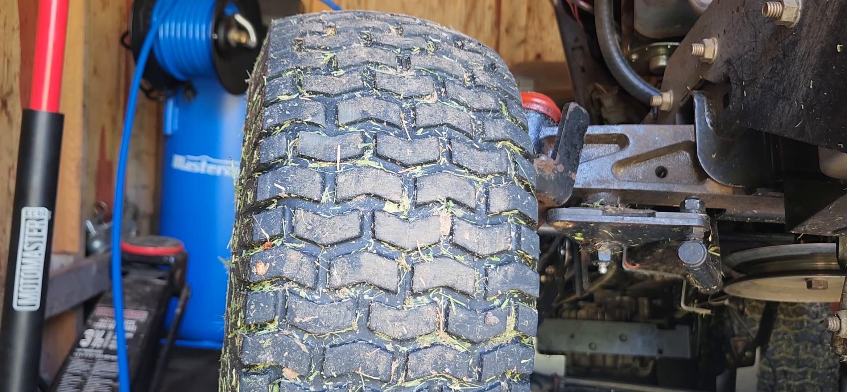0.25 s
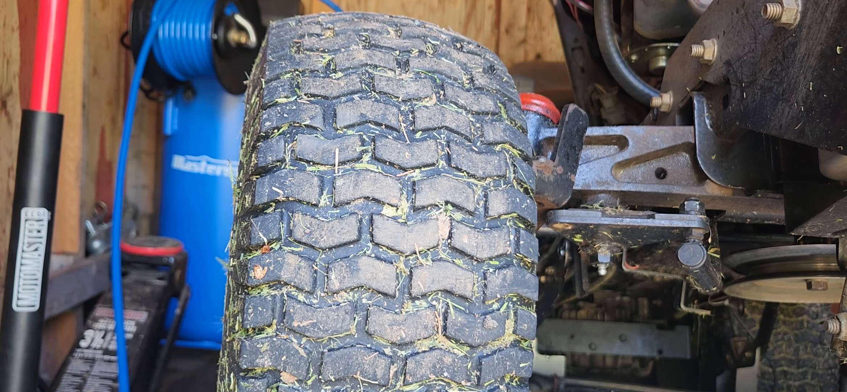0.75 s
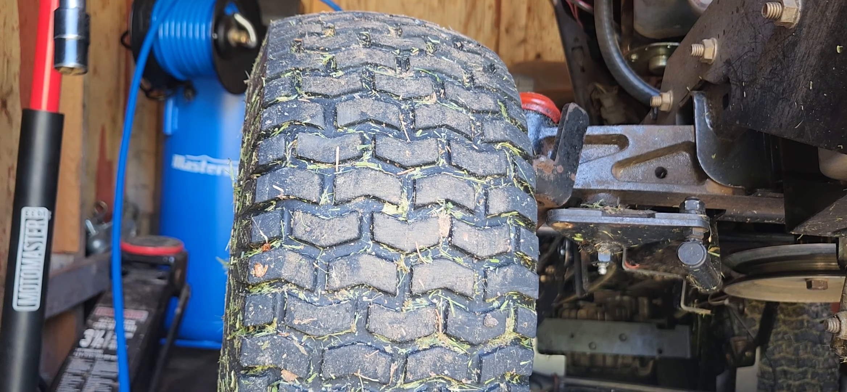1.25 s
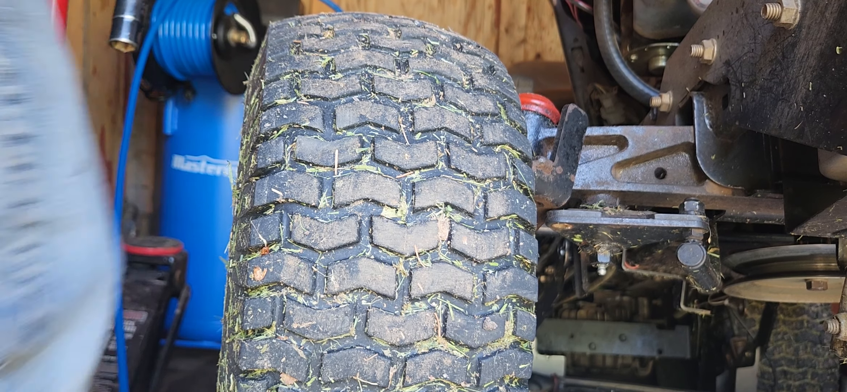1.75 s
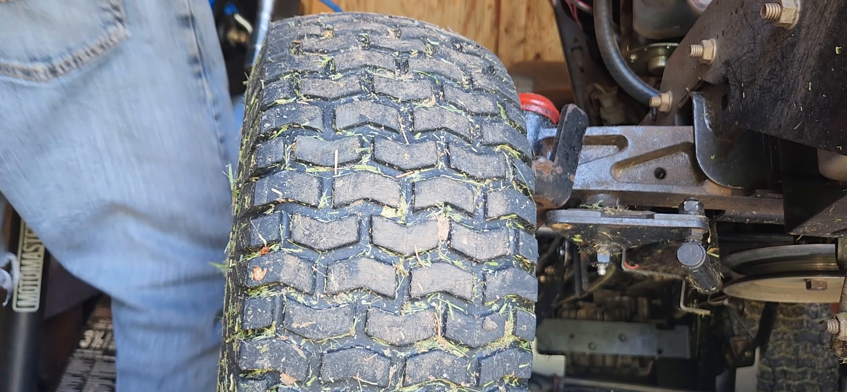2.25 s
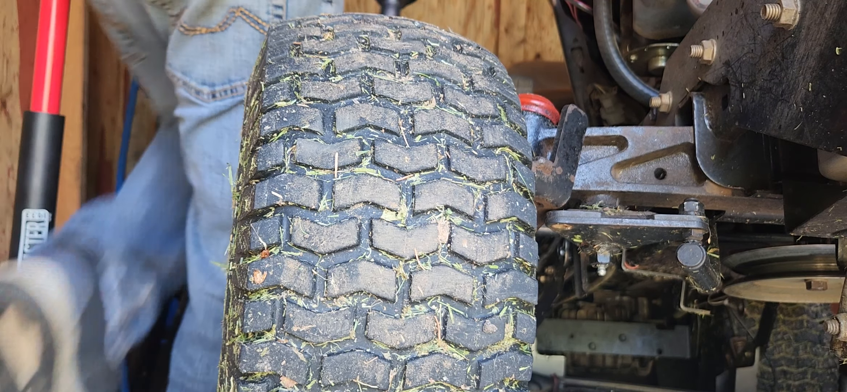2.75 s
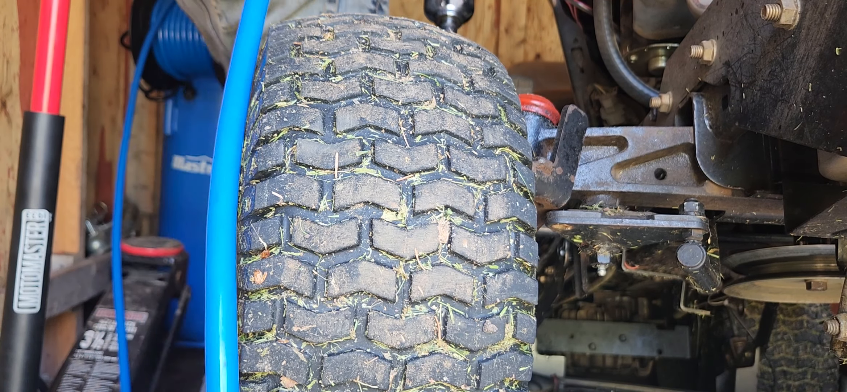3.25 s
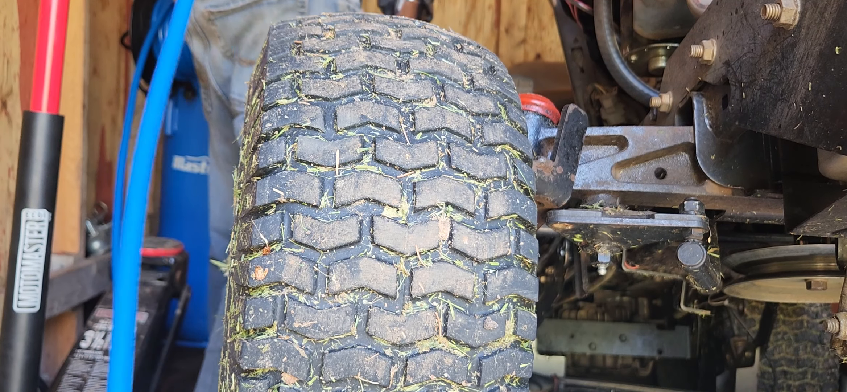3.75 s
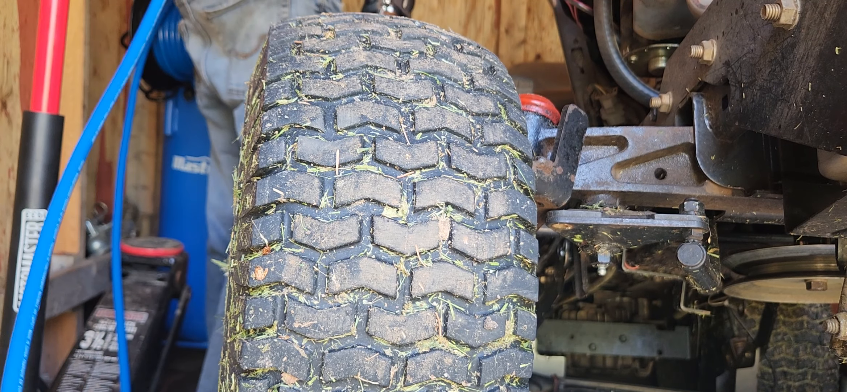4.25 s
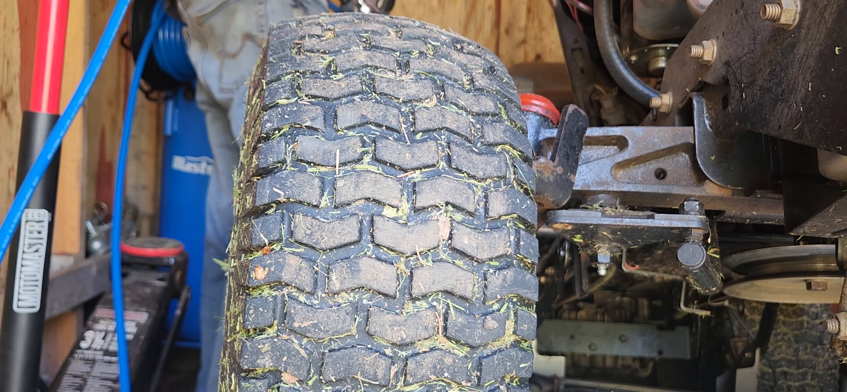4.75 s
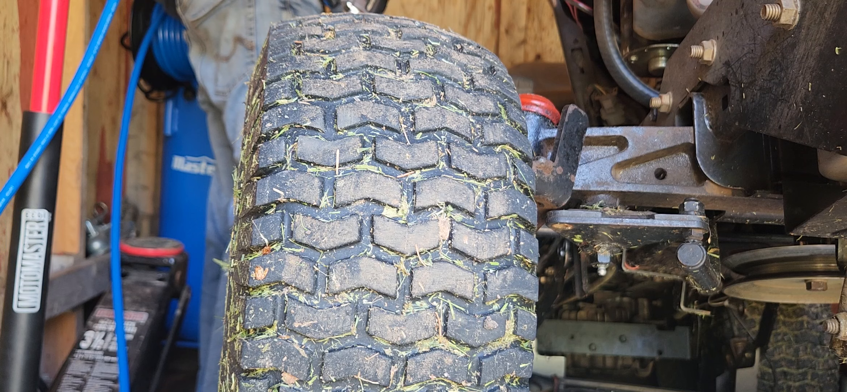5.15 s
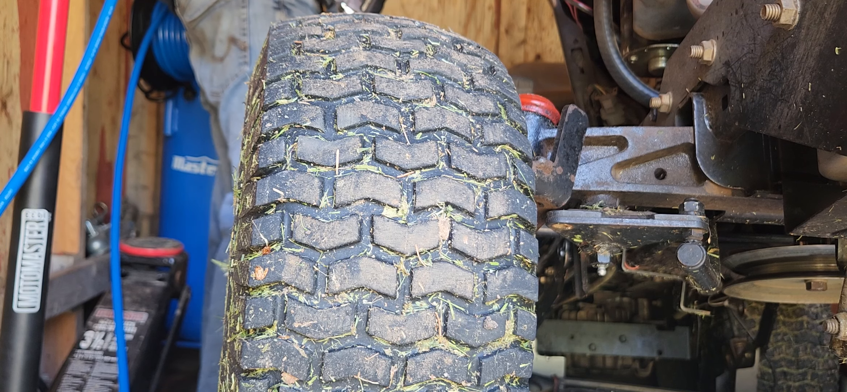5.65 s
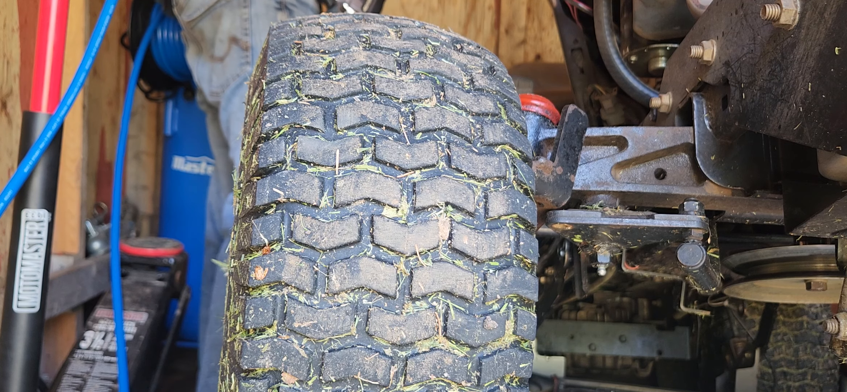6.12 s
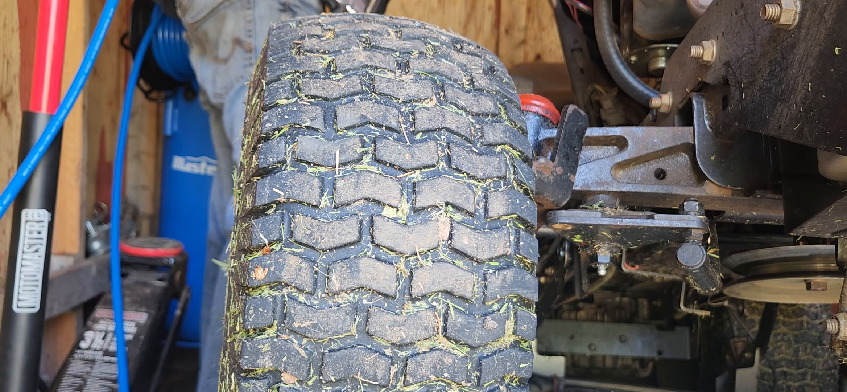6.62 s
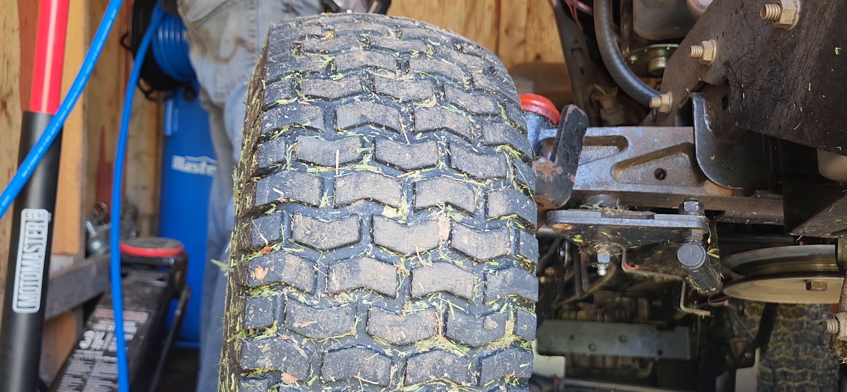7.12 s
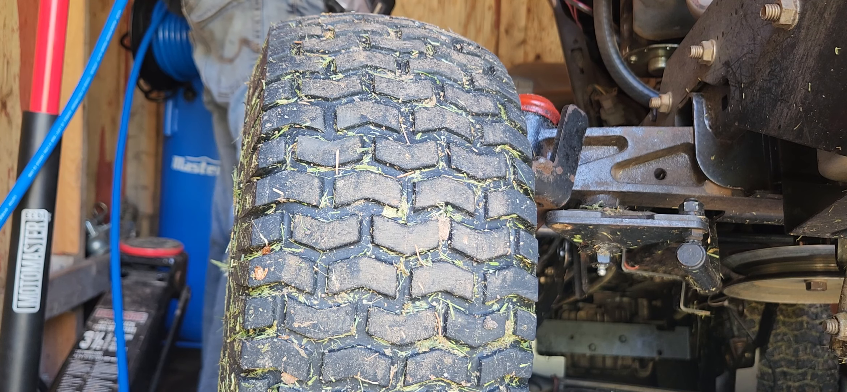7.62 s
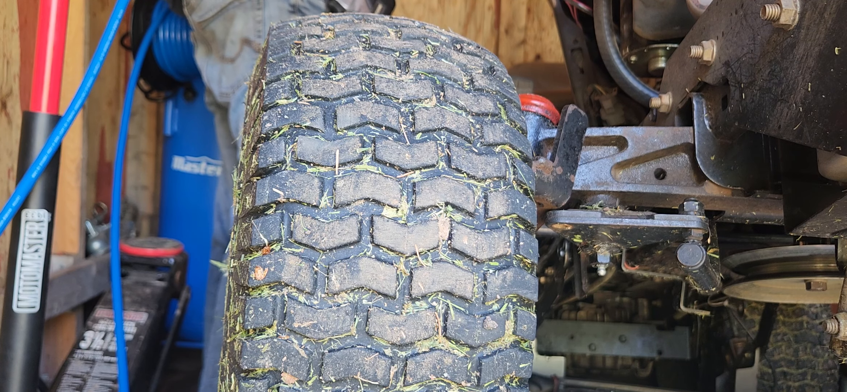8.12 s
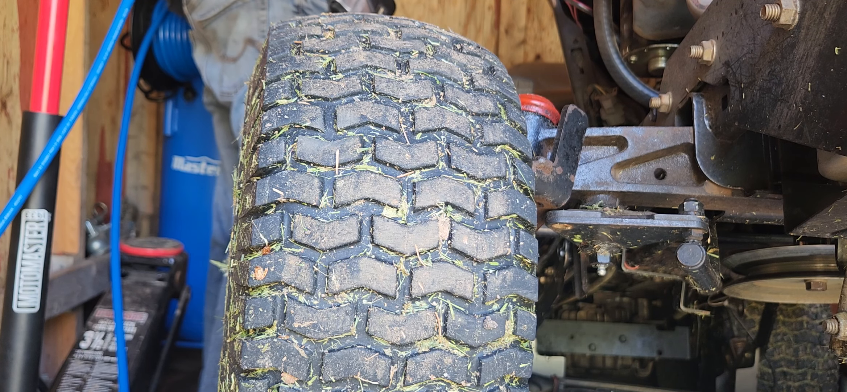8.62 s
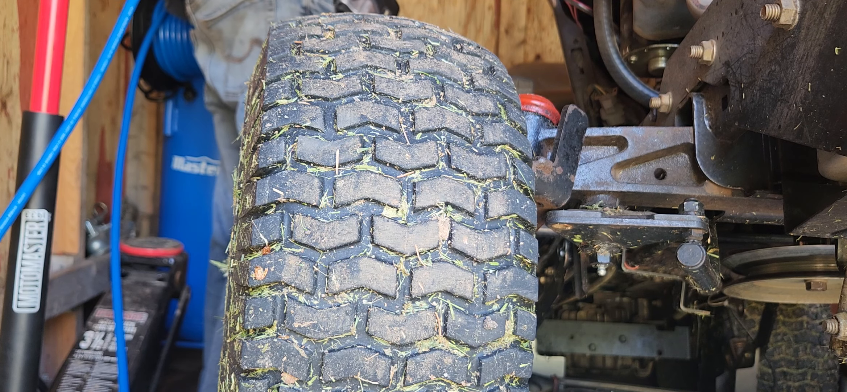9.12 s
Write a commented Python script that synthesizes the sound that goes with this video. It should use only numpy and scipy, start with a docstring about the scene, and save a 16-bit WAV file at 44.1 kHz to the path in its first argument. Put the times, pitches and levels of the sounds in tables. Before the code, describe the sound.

A shrill, steady compressed-air leak whistles and hisses while boots thud on planks and metal clicks, then it shuts off, leaving a faint seep.

```python
"""Air leak in a wooden shed

Compressed air jets from a leaking fitting and whistles in its cavities until it is shut off: noise shaped by
resonances. A faint seep then swells and fades over a constant faint room hiss, both filtered noise. Boots thud and
scuff on the plank floor and metal parts click: sums of decaying modes with short noise bursts. A vehicle nears on
the road outside: banded noise that swells. A thin hum, one wavering sine, comes and goes."""
import sys
import numpy as np
from scipy import signal
from scipy.fft import rfft, irfft, next_fast_len
from scipy.io import wavfile
from scipy.ndimage import uniform_filter1d

SR = 44100
rng = np.random.default_rng(int(sys.argv[2]) if len(sys.argv) > 2 else 0)


def int16_out(signal):
    """Quantize to a 16-bit WAV file."""
    q = np.round(np.clip(np.atleast_2d(signal).T, -1, 1) * 32767)
    wavfile.write(sys.argv[1], SR, q.astype(np.int16))


def undo_db(level):
    """Turn decibels back into plain size, where 20 dB means ten times bigger."""
    steps = np.asarray(level, float) / 20
    return 10 ** steps


N = 413738
TIME = np.arange(N) / SR
BLOW_TIME = np.arange(int(0.4 * SR)) / SR


def curve(table):
    """Each value column of a (s, value, ..) table, interpolated at every sample."""
    s, *columns = np.transpose(table)
    return [np.interp(TIME, s, column) for column in columns]


def along(table, hz):
    """A (Hz, value) table read on a log axis."""
    table_hz, value = np.transpose(table)
    return np.interp(np.log(hz + 1), np.log(table_hz + 1), value)


def colour(x, table, peaks=()):
    """Shapes x by a spectrum and by resonances (Hz, width Hz, dB) that stand above it."""
    size = next_fast_len(x.shape[-1])
    hz = np.arange(size // 2 + 1) * SR / size
    power = 1 + sum(undo_db(2 * db) / (1 + (2 * (hz - f) / width) ** 2) for f, width, db in peaks)
    gain = undo_db(along(table, hz)) * np.sqrt(power)
    return irfft(rfft(x, size) * gain, size)[..., :x.shape[-1]]


def band(x, lo_hz, hi_hz):
    """Steep band-pass, scaled to rms 1."""
    sos = signal.butter(3, [lo_hz, hi_hz], "bandpass", fs=SR, output="sos")
    y = signal.sosfiltfilt(sos, x)
    return y / np.sqrt(np.mean(y ** 2))


def walk(rate_hz):
    """Random levels held 1 / rate_hz s and slewed twice; spread near 1."""
    hold = int(SR / rate_hz)
    held = np.repeat(rng.standard_normal(N // hold + 1), hold)
    return 1.3 * uniform_filter1d(uniform_filter1d(held, hold), hold)[:N]


def shed(x, wet_db, like_hz, t60_s, lag_samples):
    """Direct sound, later on the right, plus decaying echoes shared by both ears below like_hz."""
    t = np.arange(int(0.4 * SR)) / SR
    common, *own = rng.standard_normal((3, len(t)))
    own = np.array(own)
    low = signal.butter(2, like_hz, fs=SR, output="sos")
    cloud = own + signal.sosfiltfilt(low, common - own)
    cloud = cloud * undo_db(-60 * t / t60_s) * np.minimum(t / 0.004, 1)
    cloud = cloud * undo_db(wet_db) / np.sqrt(np.mean(np.sum(cloud ** 2, axis=1)))
    direct = np.array([x, np.roll(x, lag_samples)])
    echoes = signal.fftconvolve(x[None], cloud, axes=1)[:, :N]
    return (direct + echoes) / np.sqrt(1 + undo_db(2 * wet_db))


def ring(modes, struck_hz, focus_db_per_octave, detune):
    """One blow, peak 1: modes lose level with their distance from the struck spot's pitch."""
    f, db, t60_s = np.transpose(modes)[:, :, None]
    away_db = focus_db_per_octave * np.abs(np.log2(f / struck_hz))
    size = undo_db(db - away_db - 60 * BLOW_TIME / t60_s)
    tone = np.sin(2 * np.pi * f * (1 + 0.02 * detune[:, None]) * BLOW_TIME)
    y = np.sum(size * tone, axis=0)
    return y / np.max(np.abs(y))


def add(track, s, sound):
    """Adds a sound at time s."""
    i = int(s * SR)
    track[i:i + len(sound)] += sound[:N - i]


# Road bands. Each row: low edge in Hz, high edge in Hz, steady level in dB, vehicle level at its nearest in dB,
# vehicle rise in dB per s.
ROAD = [(20.1, 95, -55.5, -41, 1.55), (95.6, 478, -59, -43.5, 6.5), (466, 1910, -56, -40, 8),
        (1875, 3700, -59.5, -49, 12.5), (3620, 6000, -63.5, -61, 4.5)]
# Spectrum of both road layers. Each row: frequency in Hz, relative density in dB per Hz.
ROAD_COLOUR = [(15, -34), (25, -14), (44, -6.5), (69, -3.5), (259, -18), (374, -20), (471, -23),
               (664, -20.5), (728, -20), (980, -21.5), (1260, -23), (1480, -25.5), (3620, -35),
               (5350, -32.5), (6000, -43), (7800, -53), (13200, -120)]
# Resonances of far traffic, then of the vehicle. Each row: frequency in Hz, width in Hz, height in dB.
ROAD_PEAKS = [(62.3, 3.4, 8), (112, 11, 2.5)]
VEHICLE_PEAKS = [(65.2, 9, 13.5), (112, 8.9, 6), (369, 15, 7), (668, 23, 9), (977, 73, 10), (1057, 46, 3.5),
                 (1500, 93, 10), (1690, 70, 10)]
# Likeness of the ears. Each row: frequency in Hz, left-right correlation (-1 to 1).
ROAD_LIKENESS = [(60, 0.99), (130, 0.95), (290, 0.85), (640, 0.42), (1410, -0.27), (3100, -0.038),
                 (6820, 0.093), (15000, 0.03)]
NEAREST_S = 9.4


def road():
    """Far traffic and a nearing vehicle through the walls: ears alike in the bass, nearly unrelated at the top."""
    likeness = np.clip(ROAD_LIKENESS, -0.5, [SR, 0.995])
    side_over_mid = [(f, 10 * np.log10((1 - c) / (1 + c))) for f, c in likeness]
    layers = []
    for peaks in (ROAD_PEAKS, VEHICLE_PEAKS):
        mid, side = colour(rng.standard_normal((2, N)), ROAD_COLOUR, peaks)
        layers.append(mid + colour(side, side_over_mid) * np.array([[1], [-1]]))
    out = 0
    for lo_hz, hi_hz, steady_db, near_db, rise_db_per_s in ROAD:
        far, near = (band(x, lo_hz, hi_hz) for x in layers)
        vehicle_db = near_db - rise_db_per_s * (NEAREST_S - TIME)
        out = out + (far * undo_db(steady_db) + near * undo_db(vehicle_db)) * undo_db(1.0 * walk(3.19))
    return out


# Spells of hum. Each row: start in seconds, length in seconds, level in dB.
HUM = [(4.126, .75, -62), (5.103, 1.14, -64), (6.3, 0.43, -63.5), (6.85, 0.29, -62.5)]
HUM_HZ, HUM_DRIFT_HZ, HUM_FADE_S = 235.6, 3.17, 0.051


def hum():
    """A thin tone that wavers a little in pitch and level, and comes and goes."""
    hz = HUM_HZ + HUM_DRIFT_HZ * walk(5.5)
    tone = np.sqrt(2) * np.sin(2 * np.pi * np.cumsum(hz) / SR)
    spells = 0
    for s, length_s, db in HUM:
        to_edge_s = np.minimum(TIME - s, s + length_s - TIME)
        spells = spells + undo_db(db) * np.clip(to_edge_s / HUM_FADE_S, 0, 1)
    return tone * spells * undo_db(1.0 * walk(7))


# Spectra of the room hiss and of the swelling seep. Each row: frequency in Hz, relative density in dB per Hz.
HISS_COLOUR = [(5000, -4), (8000, -2), (12000, -4.5), (16000, -4)]
SEEP_COLOUR = [(3000, -20), (4000, 0), (5500, -6), (6200, -14.5), (7000, -13), (8200, -8), (9000, 0.5),
               (9700, -2.5), (10300, -14), (12300, -7.5), (13500, -6), (16000, -3.5)]
# Their resonances. Each row: frequency in Hz, width in Hz, height in dB.
HISS_PEAKS = [(10700, 130, 5.5), (14250, 250, 8)]
SEEP_PEAKS = [(5100, 89, 11.5), (7500, 180, 8.5), (8800, 100, 4), (9900, 72, 4), (11700, 240, 8),
              (12850, 90, 9), (14300, 150, 5), (15400, 90, -7)]
# Swells of the seep. Each row: start in seconds, level in dB, fade in dB per s.
PUFFS = [(7.53, -55.5, 9), (7.94, -55, 9), (8.48, -55, 24)]
HISS_DB, PUFF_ATTACK_S = -65, 0.09


def room_hiss_and_seep():
    """A constant faint room hiss, and a thin stream of air that swells quickly and fades slowly."""
    hiss = colour(rng.standard_normal((2, N)), HISS_COLOUR, HISS_PEAKS)
    hiss = band(hiss, 5200, 17600) * undo_db(HISS_DB)
    seep = band(colour(rng.standard_normal((2, N)), SEEP_COLOUR, SEEP_PEAKS), 4600, 21800)
    flow = 0
    for s, db, fade_db_per_s in PUFFS:
        attack = np.clip((TIME - s) / PUFF_ATTACK_S, 0, 1)
        flow = flow + attack * undo_db(db - fade_db_per_s * np.maximum(TIME - s, 0))
    both = hiss + seep * flow * undo_db(1.0 * walk(9))
    return sum(shed(x, wet_db=9, like_hz=300, t60_s=0.24, lag_samples=13) for x in both)


# Footfalls, levels before echoes. Each row: start in seconds, thud peak in dB, struck pitch in Hz,
# scuff level in dB, added damping t60 in ms.
STEPS = [(.0, -56, 300, -39.5, 740), (.300, -20, 102.7, -38, 720), (0.366, -22, 90, -56, 320),
         (0.411, -21.5, 108, -52, 440), (0.574, -34, 86, -41, 320), (0.677, -37.5, 80, -59, 500),
         (.929, -48, 225, -36, 290), (0.966, -23.5, 112, -50, 180), (1.127, -24, 112, -34, 270),
         (1.152, -22, 124, -41.5, 160), (1.424, -21, 108, -39, 180), (1.489, -32, 109, -53, 1600),
         (1.616, -33, 105, -49, 920), (1.673, -30, 111, -33.5, 620), (1.96, -53, 60, -46.5, 450),
         (2.324, -25.5, 196, -35, 210), (2.344, -20.5, 108, -55, 170), (2.589, -41, 130, -52, 440),
         (3.175, -49, 250, -42.5, 350), (3.21, -47, 312, -48, 300), (3.511, -19.5, 177, -29.5, 260),
         (3.53, -18, 86, -38.5, 400), (3.569, -30, 45.6, -58, 280), (3.649, -34, 43, -54, 380),
         (3.699, -43, 63, -50, 300), (3.864, -50, 312, -46, 350), (3.913, -33, 160, -47, 300),
         (3.938, -43, 225, -38.5, 300), (3.963, -27.5, 162, -41.5, 300), (4.042, -31, 62, -50, 400),
         (4.966, -53, 225, -55, 240), (6.151, -35.5, 167, -44.5, 230)]
# Plank modes. Each row: frequency in Hz, relative level in dB, undamped t60 in seconds.
PLANKS = [(43, -5, 0.82), (63, -7, 0.2), (86, 7.5, 0.21), (108, 5.5, 0.42), (120.5, 5, 0.15),
          (167, 0.5, 0.24), (225, 4, 0.3), (312, 3, .2), (375, 9, 0.17), (517, -12, .2), (668, -14, .15)]
# Scuff spectrum. Each row: frequency in Hz, relative density in dB per Hz.
SCUFF_COLOUR = [(150, 0.5), (300, 5), (600, -3), (1200, -19), (2500, -20), (5000, -48)]
LOAD_S, SCUFF_ATTACK_S, SCUFF_DECAY_S = 0.009, 0.0019, 0.04


def steps():
    """A soft heel loads the planks over a few milliseconds; the sole scrapes for a moment."""
    thuds, scrape = np.zeros(N), np.zeros(N)
    chance = rng.standard_normal((len(STEPS), len(PLANKS)))
    t = BLOW_TIME
    load = 1 - np.exp(-t / LOAD_S)
    scuff = np.minimum(t / SCUFF_ATTACK_S, 1) * np.exp(-t / SCUFF_DECAY_S)
    for (s, db, hz, scuff_db, t60_ms), detune in zip(STEPS, chance):
        # the weight that stays on the plank damps its ring
        damping = undo_db(-60 * t / (t60_ms / 1000))
        blow = ring(PLANKS, hz, 32, detune) * load * damping
        add(thuds, s, undo_db(db) * blow / np.max(np.abs(blow)))
        add(scrape, s, undo_db(scuff_db) * scuff)
    grit = band(colour(rng.standard_normal(N), SCUFF_COLOUR), 114, 4600) * undo_db(2.0 * walk(90))
    thuds = shed(thuds, wet_db=-4, like_hz=325, t60_s=0.33, lag_samples=15)
    return thuds + shed(scrape * grit, wet_db=2.0, like_hz=334, t60_s=0.12, lag_samples=3)


# Clicks, levels before filter and echoes. Each row: start in seconds, peak in dB, struck pitch in Hz,
# rattle over the click peak in dB.
CLICKS = [(0.7127, -11.5, 4100, -23.5), (.7214, -32, 3500, -21), (1.1433, -25, 2300, -19),
          (1.60, -33.5, 2300, -17), (1.69, -46, 1500, -8), (1.97, -40, 1500, -9), (3.1878, -38, 1140, -16),
          (3.515, -43, 2300, -5), (3.92, -44, 2300, -3), (6.146, -34, 784, -8), (6.162, -35, 780, -11),
          (6.17, -43, 2300, -4), (6.195, -40, 1282, -8), (7.42, -55, 2300, 1), (7.892, -49, 1050, -6)]
# Modes of the metal coupling. Each row: frequency in Hz, relative level in dB, t60 in seconds.
METAL = [(596, -2, 0.18), (756, 19, 0.12), (1050, 1, 0.033), (1282, 2, 0.14), (2300, 2, .06),
         (2600, -23, .08), (3140, 9.5, 0.027), (3500, 14, 0.023), (3780, 19, 0.015), (4550, 11, 0.016),
         (5350, 9, 0.021)]
# Rattle spectrum. Each row: frequency in Hz, relative density in dB per Hz.
RATTLE_COLOUR = [(500, 1.5), (1200, 1), (3000, 1), (5000, -3)]
RATTLE_DECAY_S, DULL_BELOW_HZ, DULL_TOP_HZ = 0.03, 1400, 1720


def clicks():
    """Short rings of the coupling, each with a brief rattle; low-pitched blows rattle without treble."""
    track, bright, dull = np.zeros(N), np.zeros(N), np.zeros(N)
    chance = rng.standard_normal((len(CLICKS), len(METAL)))
    decay = np.exp(-TIME[:SR // 4] / RATTLE_DECAY_S)
    for (s, db, hz, rattle_db), detune in zip(CLICKS, chance):
        add(track, s, undo_db(db) * ring(METAL, hz, 9, detune))
        add(dull if hz < DULL_BELOW_HZ else bright, s, undo_db(db + rattle_db) * decay)
    noise = colour(rng.standard_normal(N), RATTLE_COLOUR, [(f, 0.095 * f, 5) for f, _, _ in METAL])
    rattle = bright * band(noise, 760, 5800) + dull * band(noise, 450, DULL_TOP_HZ)
    rattle = rattle * undo_db(3.6 * walk(200))
    track = signal.sosfilt(signal.butter(2, 700, "highpass", fs=SR, output="sos"), track)
    both = shed(track + rattle, wet_db=-8, like_hz=450, t60_s=0.12, lag_samples=2)
    return both * undo_db(np.array([[1.2], [-1.2]]))  # louder on the left


# Jet flow. Each row: time in seconds, top hiss in dB, then in dB above the top hiss: low whistle,
# hiss under the whistle, lowest hiss.
JET = [(0, -30.5, -19, -16, -24.5), (.9, -31, -26.5, -16, -22), (1.6, -31, -24.5, -15, -24),
       (2.4, -32, -19, -16.5, -22.5), (4.6, -31.5, -19.5, -17, -23), (5.1, -32.5, -14.5, -14.5, -19.5),
       (5.9, -31, -17, -17, -19.5), (6.3, -30, -16, -20, -22.5), (6.8, -31, -20, -20.5, -25.5)]
# Jet spectrum. Each row: frequency in Hz, relative density in dB per Hz.
JET_COLOUR = [(1500, -32.5), (2600, -39), (4400, -21), (5300, -12), (6600, -11), (7000, -15.5),
              (7600, -13.5), (8200, -19), (9400, -17), (10000, -11.5), (12100, -9), (12800, -3.5),
              (15000, -7), (15800, -5)]
# Cavities of the fitting. Each row: frequency in Hz before any rise, width in Hz, dB over the plain jet.
CAVITIES = [(5300, 140, -14), (5780, 40, -1), (6278, 130, 15.5), (10370, 65, 9.5), (11020, 55, 7),
            (11430, 41, 7), (12100, 84, 3), (12570, 70, 14.5), (13230, 290, 18.5), (13250, 90, 13.5),
            (13360, 130, 13), (14300, 200, 14), (14650, 300, 13)]
# Ear balance. Each row: frequency in Hz, left minus right in dB.
JET_BALANCE = [(60, 0.5), (110, 1.0), (200, 0.0), (380, 1.0), (700, 1.0), (1290, 2), (2380, 9.5),
               (4400, -5), (8120, 8.5), (15000, 2)]
STREAMS, MIDDLE_DB = 3, -11  # middle hiss above the top hiss
CLOSING_S, SHUT_S, CLOSING_DB = 6.88, 7.04, -2  # the valve narrows, losing this much, then shuts
SHUT_DB_PER_S, TOP_FIRST_DB = 500, -8  # fall after shutting; the top fades further while closing
RISE_FROM_S, RISE_HZ_PER_S = 5.7, 150  # the top whistles creep upward


def jet():
    """Turbulent streams excite the cavities, each with its own echoes; each part of the hiss flutters by itself."""
    top_db, whistle_db, under_db, lowest_db = curve(JET)
    closing = np.clip((TIME - CLOSING_S) / (SHUT_S - CLOSING_S), 0, 1) ** 2
    shut_db = SHUT_DB_PER_S * np.clip(TIME - SHUT_S, 0, 0.3)
    flow_db = top_db + CLOSING_DB * closing - shut_db
    air = colour(rng.standard_normal((STREAMS, N)), JET_COLOUR, CAVITIES)
    # a growing frequency shift of the analytic signal
    rise_hz = RISE_HZ_PER_S * np.maximum(TIME - RISE_FROM_S, 0)
    turn = np.exp(2j * np.pi * np.cumsum(rise_hz) / SR)
    risen = np.real(signal.hilbert(air, next_fast_len(N))[:, :N] * turn)
    # Each row: source, level over the flow in dB, low edge in Hz, high edge in Hz, flutter in dB.
    parts = [(risen, TOP_FIRST_DB * closing, 12000, 19500, 0.8),
             (air, whistle_db, 5900, 6700, 1.5),
             (air, MIDDLE_DB, 6700, 12000, 0.5),
             (air, under_db, 3600, 5900, 0.5),
             (air, lowest_db, 1400, 3600, 0.5)]
    dry_streams = 0
    for x, db, lo_hz, hi_hz, flutter_db in parts:
        level_db = flow_db + db + flutter_db * walk(14)
        dry_streams = dry_streams + band(x, lo_hz, hi_hz) * undo_db(level_db)
    both = sum(shed(x, wet_db=6.5, like_hz=300, t60_s=0.14, lag_samples=13) for x in dry_streams)
    both = both / np.sqrt(STREAMS)
    left = colour(both[0], [(f, db / 2) for f, db in JET_BALANCE])
    right = colour(both[1], [(f, -db / 2) for f, db in JET_BALANCE])
    return np.array([left, right])


def scene():
    """All sources at the two ears."""
    return jet() + room_hiss_and_seep() + road() + hum() + steps() + clicks()


def top_cut(x):
    """Nothing passes above the cut-off."""
    return signal.sosfilt(signal.butter(12, 17070, fs=SR, output="sos"), x)


def record(dry):
    """A steep elliptic low-pass cuts the top of the mix."""
    low_pass = signal.ellip(10, 0.2, 60, 15720, fs=SR, output="sos")  # ripple dB, stop dB, edge Hz
    mix = signal.sosfilt(low_pass, dry)
    return top_cut(mix)


dry = scene()
out = record(dry)
int16_out(out)
```